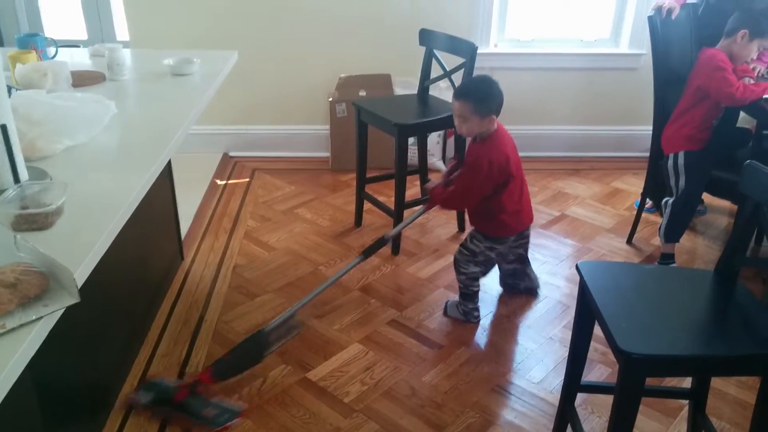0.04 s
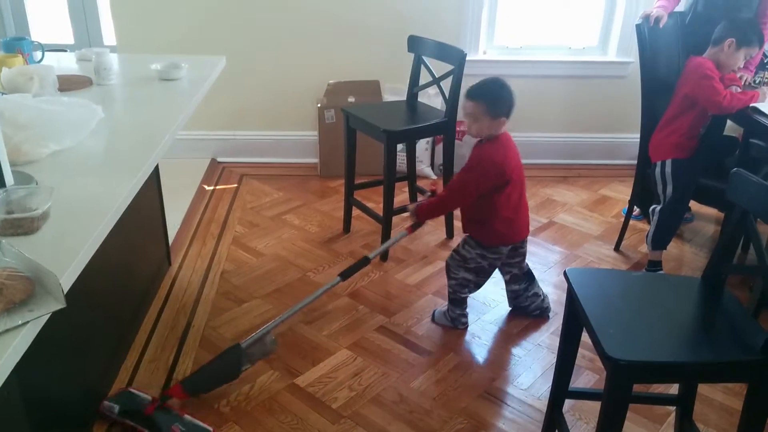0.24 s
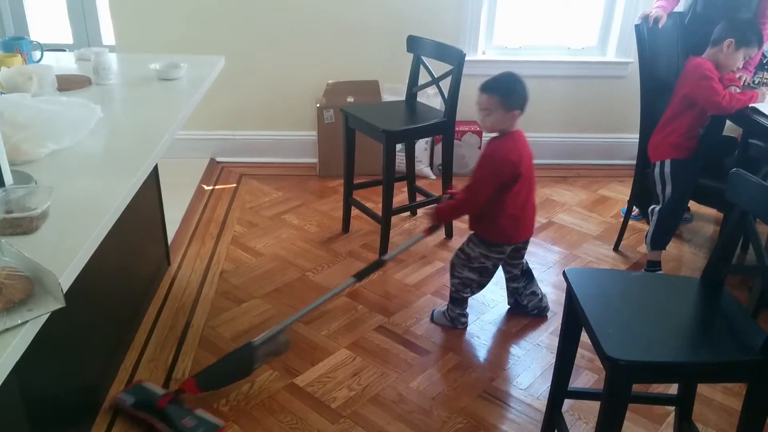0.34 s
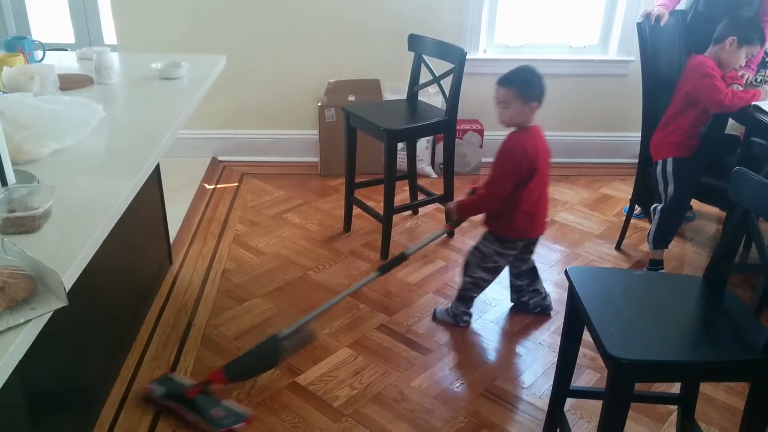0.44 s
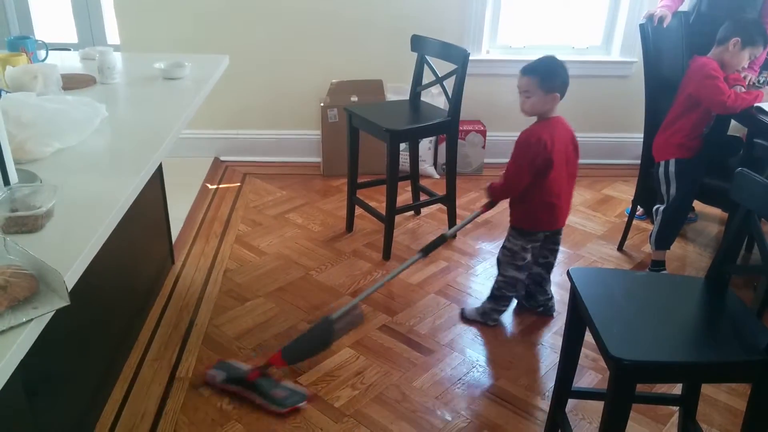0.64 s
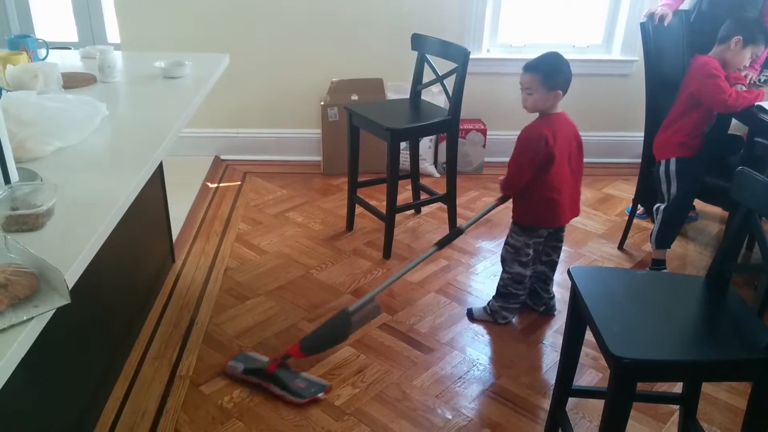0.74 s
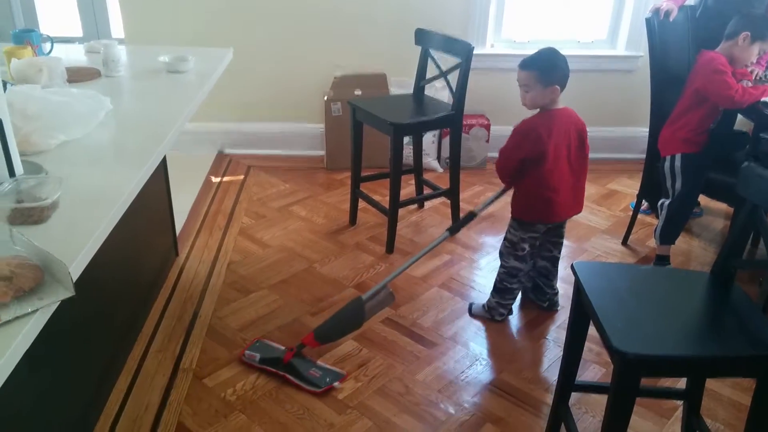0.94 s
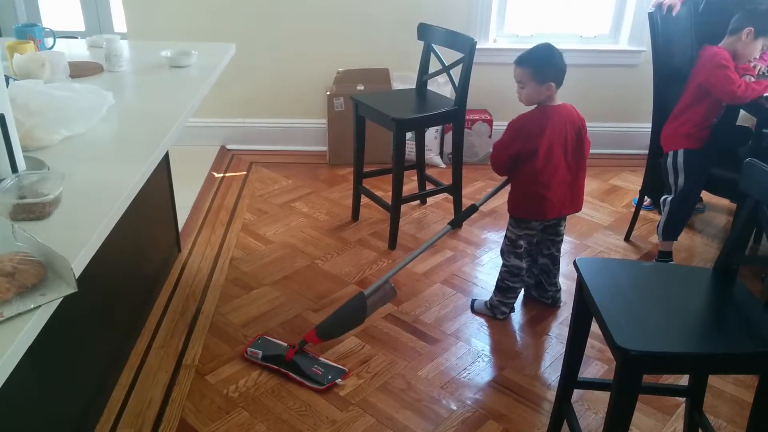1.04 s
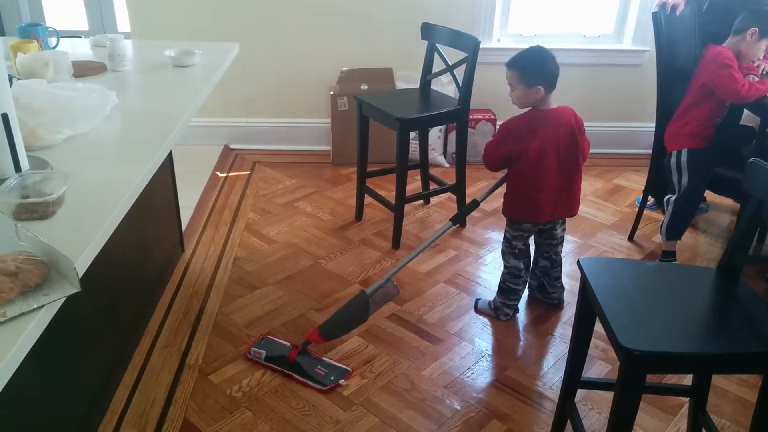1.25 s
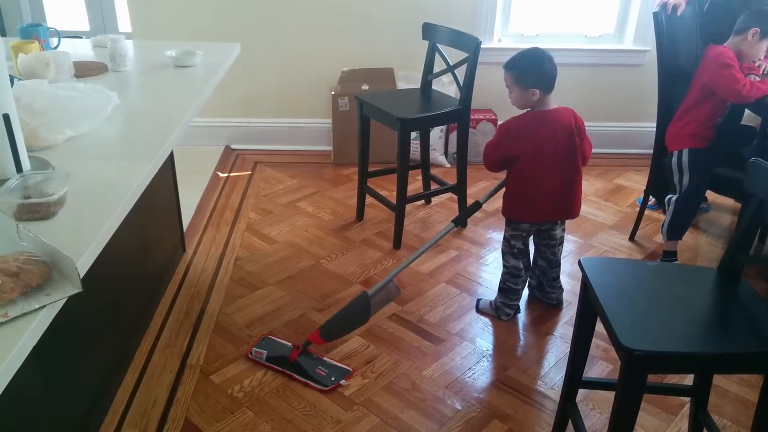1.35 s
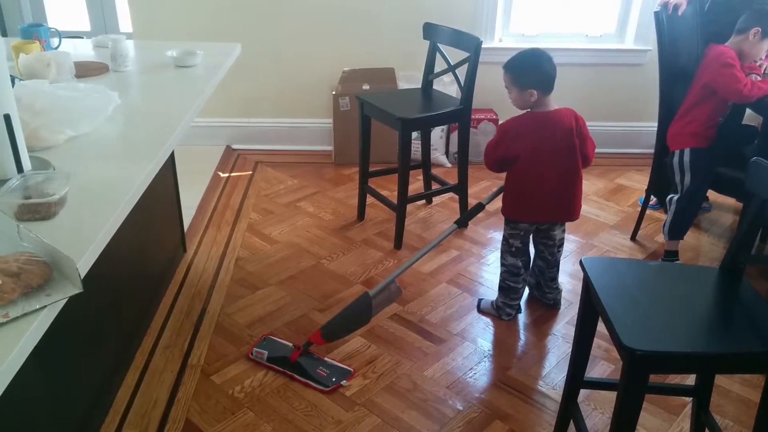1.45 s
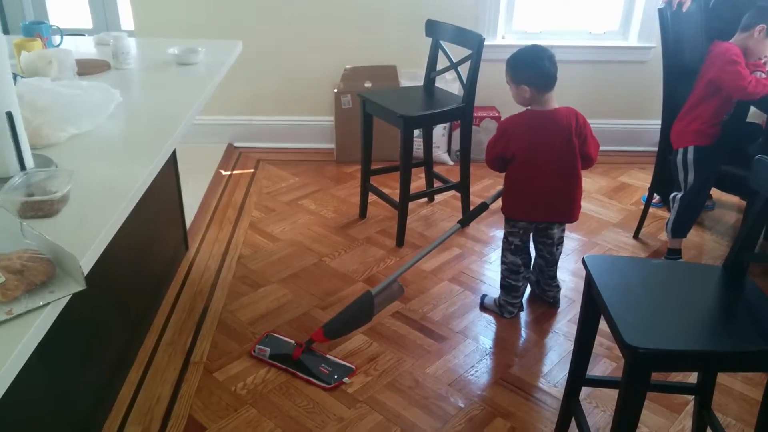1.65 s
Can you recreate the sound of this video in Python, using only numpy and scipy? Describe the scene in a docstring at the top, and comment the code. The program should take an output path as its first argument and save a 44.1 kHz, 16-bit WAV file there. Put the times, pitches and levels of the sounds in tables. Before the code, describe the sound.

A flat mop thumps on wood: after a faint cloth slide over low hum and hiss, it lands at about 0.23 s with a deep boom and plastic rattle lasting to 0.3 s. Bare-room echo dies away. Very soft footfalls come at 0.6-0.76 s, a weak hollow wooden knock flutters around 1.18-1.29 s, and a small plastic tick with quick echo sounds at 1.46 s. Level dips briefly throughout.

```python
"""A bare, echoing kitchen: a flat mop slides over the wooden floor and thumps into a cabinet base.
Soft footfalls, small plastic ticks (the strongest with an echo) and a hollow knock follow, over hum and hiss.
Hits are dying modes plus coloured clicks; slide and hiss are shaped noise; dense echoes make the room.
The direct clatter reaches the microphone dulled, and the whole level dips briefly at set times."""
import sys
import numpy as np
from scipy import signal
from scipy.io import wavfile
from scipy.ndimage import uniform_filter1d

SR = 44100
rng = np.random.default_rng(int(sys.argv[2]) if len(sys.argv) > 2 else 0)


def materialize(psi):
    """Save the field psi as 16-bit PCM at rate SR to the path in sys.argv[1].

    A 1-D psi becomes a single channel; in a 2-D psi each row is a channel.
    """
    bounded = np.clip(np.atleast_2d(psi).T, -1, 1)
    quanta = np.round(bounded * 32767).astype(np.int16)
    wavfile.write(sys.argv[1], SR, quanta)


def gain_from_db(level_db):
    """Turn a decibel level (scalar or array-like) into a linear amplitude factor."""
    decades = np.asarray(level_db, float) / 20
    return 10 ** decades


N = 74970  # length in samples, 1.7 s

# Spectrum tables give relative levels per Hz; their sounds are scaled to a set level afterwards.
# Microphone hiss: (frequency [Hz], level [dB])
HISS_SPECTRUM = [(53, -42), (90, -8), (165, -7.5), (529, -17), (907, -24), (1700, -26), (1930, -45),
                 (3610, -22.5), (15700, -27.5)]
# Slow drift of hum, rumble and hiss together: (time [s], level [dB])
BACKGROUND_DRIFT = [(0, 1), (.22, 7.5), (.6, 0.5), (1.0, 0.5), (1.4, 1), (1.7, -2.5)]
# Further drift of hum and rumble, strongest at first: (time [s], level [dB])
HUM_DRIFT = [(0, 4.5), (.22, -2), (.5, -3.5), (1.0, 2.5), (1.26, 1.5), (1.38, -2), (1.7, 1)]
# Brief dips of the whole level: (centre [s], half length [s], depth [dB])
LEVEL_DIPS = [(0, 0.011, -6), (0.074, 0.0053, -7.5), (0.545, 0.016, -6), (0.603, 0.004, -2),
              (0.689, 0.021, -12.5), (0.851, 0.032, -21), (0.923, 0.0038, -9), (.99, 0.014, -14),
              (1.035, 0.02, -14.5), (1.105, 0.0074, -8), (1.156, 0.018, -6.5), (1.332, 0.03, -3),
              (1.401, 0.023, -8.5), (1.442, 0.0044, -7), (1.502, 0.011, -7.5)]
# Cloth pad sliding: (time [s], level [dB])
SLIDE_LEVEL = [(0, -54.5), (0.101, -50.5), (0.203, -46), (.23, -43.5), (.45, -41), (.63, -56), (0.781, -57),
               (.95, -59.5), (1.1, -60.5), (1.7, -65.5)]
# Colour of the cloth on the boards: (frequency [Hz], level [dB])
CLOTH_SPECTRUM = [(71, -27), (120, 1), (350, -0.5), (546, -8.5), (770, -3), (2640, -7.5), (15000, -27.5)]
# Boards pushed and springing back: (time [s], level [dB])
BOARD_BOOMS = [(0.2277, -10.5), (0.2448, -17.5), (0.2537, -10), (.283, -23.5), (0.2952, -18.5)]
# Polarity of each boom: (sign)
BOOM_SIGNS = [-1, -1, 1, 1, -1]
# Mop head rattling as it lands: (time [s], level [dB])
HEAD_CLATTERS = [(0.2279, 6), (0.2368, -14), (0.2465, -16), (0.256, -5), (.270, -0.5), (0.283, -9),
                 (0.2947, -0.5)]
# Floor and cabinet modes: (frequency [Hz], level [dB], decay by 60 dB [s])
BOARD_MODES = [(59.1, 5, 0.23), (76, 4.5, 0.15), (96.3, 8, 0.16), (114.6, 6, 0.18), (129.7, -4.5, 0.14),
               (147, -0.5, 0.19), (190.2, -5, 0.42), (221.3, -7.5, 0.45), (254.6, -5, 0.31),
               (305, -8, 0.27), (419, -15, 0.19), (503.7, -20.5, 0.67), (623.7, -20, 0.44),
               (702.6, -12.5, 0.16)]
# Clatter of the plastic mop head: (frequency [Hz], level [dB])
CLATTER_SPECTRUM = [(180, -47), (300, -3.5), (550, -8), (820, -9), (1200, -8.5), (1700, -10.5),
                    (2300, -7.5), (3000, -13), (3900, -12.5), (4700, -20), (5400, -17.5), (6300, -21),
                    (7400, -27.5), (9500, -30.5), (10400, -30.5), (15700, -43.5)]
# Soft footfalls on the same boards: (time [s], bass level [dB], scuff level [dB])
FOOTFALLS = [(.622, -48, -28.5), (.718, -47, -48), (.762, -56, -46)]
# Sock on varnish: (frequency [Hz], level [dB])
SCUFF_SPECTRUM = [(700, -15), (1500, -15), (3000, -2.5), (5200, 1.5), (7000, -10), (15700, -19)]
# Small plastic ticks, the strongest with an echo 13 ms later: (time [s], level [dB])
TICK_TIMES = [(1.161, -36), (1.4574, -18), (1.4703, -27.5), (1.518, -36), (1.541, -36)]
# Colour of a tick: (frequency [Hz], level [dB])
TICK_SPECTRUM = [(600, -19), (1100, -5.5), (1450, -8.5), (1800, 0), (2700, 3), (3300, -0.5), (4000, -4.5),
                 (5500, -15), (10200, -21), (15700, -24)]
# Ringing of the plastic: (frequency [Hz], level [dB], decay by 60 dB [s])
TICK_MODES = [(1150, -18, .015), (2330, -4, .016), (2580, 0, .018), (3400, -8, .009)]
# Hollow wooden knocks: (time [s], ring level [dB], click level [dB])
KNOCK_TIMES = [(1.179, -32.5, -13), (1.185, -32, -23), (1.1945, -21, -24.5), (1.2025, -25.5, -31),
               (1.225, -30, -32), (1.240, -38, -25.5), (1.254, -30.5, -27.5), (1.274, -37, -36.5),
               (1.285, -42, -25)]
# Modes of the hollow wood: (frequency [Hz], level [dB], decay by 60 dB [s])
HOLLOW_MODES = [(226, -28, 0.17), (297, -9, 0.07), (372, -4, 0.07), (414, 4, 0.05), (456, -5, 0.08),
                (510, -10, 0.09), (570, -13, 0.08), (606, -14, 0.08)]
# Click of a knock: (frequency [Hz], level [dB])
CLICK_SPECTRUM = [(500, -5), (900, -9), (1500, -15), (2100, -10), (3200, -15.5), (4500, -14), (8000, -21.5),
                  (15700, -34)]
# Room decay before a sound's own tail share: (frequency [Hz], decay by 60 dB [s])
ROOM_DECAY = [(60, 0.86), (160, 0.64), (420, 0.66), (1100, 0.61), (2910, 0.65), (6300, 0.73), (9000, 0.62)]

HISS_DB, HUM_HZ, HUM_DB = -59.5, 60, -50  # levels before the drifts
RUMBLE_HZ, RUMBLE_WIDTH_HZ, RUMBLE_DB = 65, 30, -58
HUM_DIP = 0.43  # share of each dip that hum and rumble take on top of the common one
SLIDE_PATCHY_DB, HISS_PATCHY_DB = 0.8, 0.4
RISE_CYCLES, SCATTER_S = 0.57, 0.001894  # swell of a mode; latest start of a mode
DETUNE, SPOT_DB = 0.035, 4  # full spread of mode frequency (share) and of mode level
TICK_RING_DB, TICK_DRY_DB = -14, -8
ECHO_SPREAD_DB = 5  # some reflections are much stronger than their neighbours
BUILD_S = 0.0047  # build-up time of the reflections
WET_DB, BASS_WET_DB, TAIL = 4.5, -9.5, 0.88  # room on thump and footfalls; share of its decay time
LATE_WET_DB, LATE_BASS_WET_DB, TICK_WET_DB, LATE_TAIL = 2.5, -10, 3, 0.66  # knocks and ticks
DIRECT_DB, DIRECT_HZ = -8.5, 3450  # direct clatter, shaded by the counter
MIC_LOW_HZ, MIC_HIGH_HZ = 50, 15750


def evened(x):
    """Scales to rms 1."""
    return x / np.sqrt(np.mean(x ** 2) + 1e-20)


def over_time(points):
    """Reads a table of times and levels at every sample."""
    return np.interp(np.arange(N) / SR, *np.transpose(points))


def over_frequency(points, hz):
    """Reads a table on a log-frequency axis."""
    f, value = np.transpose(points)
    return np.interp(np.log(hz + 1), np.log(f + 1), value)


def add(mix, s, sound):
    """Mixes a sound in at a time in seconds."""
    part = mix[round(s * SR):][:len(sound)]
    part += sound[:len(part)]


def noise(spectrum, size, patchy_db):
    """Noise of a given colour whose level wanders in patches of time and frequency, rms 1."""
    frames, hz = size // 128 + 6, np.fft.rfftfreq(512, 1 / SR)
    a, b, patches = rng.standard_normal((frames, 257, 3)).T
    patches = uniform_filter1d(patches, size=8, axis=0)  # along frequency
    patches = evened(uniform_filter1d(patches, size=12, axis=1))  # along time
    inside = (hz >= spectrum[0][0])[:, None]
    level = over_frequency(spectrum, hz)[:, None] + patchy_db * patches
    z = (a + 1j * b) * inside * gain_from_db(level)
    return evened(signal.istft(z, nperseg=512, noverlap=384)[1][256:size + 256])


def ring(modes, scatter_s, detune=0.):
    """Dying modes, peak 1; each blow lands on another spot and weighs them a little differently."""
    out = np.zeros(SR // 2)
    for (hz, db, t60), (spot, late, shift) in zip(modes, rng.random((len(modes), 3))):
        hz = hz * (1 + detune * (shift - 0.5))
        t = np.maximum(np.arange(SR // 2) / SR - late * scatter_s, 0)
        decay = gain_from_db(db + SPOT_DB * (spot - 0.5) - 60 * t / t60)
        swell = 1 - np.exp(-t * hz / RISE_CYCLES)
        out += decay * swell * np.sin(2 * np.pi * hz * t)
    return out / abs(out).max()


def crack(spectrum):
    """A minimum-phase click of the given colour, starting at once, energy 1."""
    hz = abs(np.fft.fftfreq(2048, 1 / SR))
    gain = gain_from_db(over_frequency(spectrum, hz)) * (hz >= spectrum[0][0])
    log_gain = np.log(gain + 1e-4)
    phase = -signal.hilbert(log_gain).imag
    out = np.fft.ifft(np.exp(log_gain + 1j * phase)).real[:1024]
    return out / np.linalg.norm(out)


def blows(rows, modes, colour):
    """Hits as a low ringing part and a bright click."""
    low, high = np.zeros((2, N))
    for s, ring_db, click_db in rows:
        add(low, s, -gain_from_db(ring_db) * ring(modes, SCATTER_S, DETUNE))
        add(high, s, gain_from_db(click_db) * crack(colour))
    return np.array([low, high])


def dips_db():
    """The brief dips of the level as one curve in dB."""
    t = np.arange(N) / SR
    return sum(db * np.exp(-abs((t - s) / half) ** 2.7) for s, half, db in LEVEL_DIPS)


def background():
    """Appliance hum at mains pitch, a narrow band of rumble round it, and microphone hiss."""
    t = np.arange(N) / SR
    r = np.exp(-np.pi * RUMBLE_WIDTH_HZ / SR)
    a, b = rng.standard_normal((N, 2)).T
    slow = signal.lfilter([1 - r], [1, -r], a + 1j * b)
    slow = signal.lfilter([1], [1, -r], slow)
    rumble = evened((slow * np.exp(2j * np.pi * RUMBLE_HZ * t)).real)  # slow noise moved up in pitch
    hum = np.sqrt(2) * np.sin(2 * np.pi * (HUM_HZ * t + rng.random()))
    hum_gain = gain_from_db(HUM_DIP * dips_db() + over_time(HUM_DRIFT))
    humming = hum_gain * (gain_from_db(HUM_DB) * hum + gain_from_db(RUMBLE_DB) * rumble)
    hiss = gain_from_db(HISS_DB) * noise(HISS_SPECTRUM, N, HISS_PATCHY_DB)
    return gain_from_db(over_time(BACKGROUND_DRIFT)) * (humming + hiss)


def slide():
    """Cloth rubbing over varnished boards: friction noise that follows a level curve."""
    return gain_from_db(over_time(SLIDE_LEVEL)) * noise(CLOTH_SPECTRUM, N, SLIDE_PATCHY_DB)


def thump():
    """The heavy blow: boards booming in either direction and the rattling mop head."""
    low, high = np.zeros((2, N))
    for (s, db), sign in zip(BOARD_BOOMS, BOOM_SIGNS):
        add(low, s, sign * gain_from_db(db) * ring(BOARD_MODES, SCATTER_S))
    for s, db in HEAD_CLATTERS:
        add(high, s, gain_from_db(db) * crack(CLATTER_SPECTRUM))
    return np.array([low, high])


def room(x, share):
    """Dense reflections that build up quickly, each band dying at its own speed."""
    taps = np.zeros(SR)
    at = np.arange(20, SR - 8, 8)
    places = at + rng.integers(0, 8, len(at))
    signs = rng.choice([-1., 1.], len(at))
    taps[places] = signs * gain_from_db(ECHO_SPREAD_DB * rng.standard_normal(len(at)))
    hz, t, z = signal.stft(taps, SR, nperseg=512)
    t60 = np.clip(share * over_frequency(ROOM_DECAY, hz), 0.1, 2)[:, None]
    tail = signal.istft(z * gain_from_db(-60 * t / t60), SR, nperseg=512)[1][:SR]
    tail = tail * (1 - np.exp(-np.arange(len(tail)) / SR / BUILD_S))
    return signal.fftconvolve(x, tail / np.linalg.norm(tail))[:N]


def footfalls():
    """Soft steps: the boards ring low and a sock scuffs the varnish."""
    return blows(FOOTFALLS, BOARD_MODES, SCUFF_SPECTRUM)


def ticks():
    """Small plastic ticks and the echo of the strongest: a bright snap and a short ringing body."""
    snap, body = np.zeros((2, N))
    for s, db in TICK_TIMES:
        add(snap, s, gain_from_db(db) * crack(TICK_SPECTRUM))
        add(body, s, gain_from_db(db + TICK_RING_DB) * ring(TICK_MODES, 0, DETUNE))
    return snap, body


def knocks():
    """Hollow wooden knocks: short modes of the wood under a click."""
    return blows(KNOCK_TIMES, HOLLOW_MODES, CLICK_SPECTRUM)


def scene():
    """Hits, direct and through the room, over slide and background."""
    low, high = thump() + footfalls()
    snap, body = ticks()
    knock, click = knocks()
    wet = room(gain_from_db(BASS_WET_DB) * low + gain_from_db(WET_DB) * high, TAIL)
    late_send = gain_from_db(LATE_BASS_WET_DB) * knock + gain_from_db(LATE_WET_DB) * click + gain_from_db(TICK_WET_DB) * snap
    late_wet = room(late_send, LATE_TAIL)
    shade = signal.butter(4, DIRECT_HZ, fs=SR, output="sos")
    direct = gain_from_db(DIRECT_DB) * signal.sosfilt(shade, high + click)
    dry_hits = low + knock + body + gain_from_db(TICK_DRY_DB) * snap + direct
    return (dry_hits + wet + late_wet + slide() + background())[None]


def top_cut(x):
    """Nothing passes above the cut-off."""
    return signal.sosfilt(signal.butter(12, 15850, fs=SR, output="sos"), x)


def record(dry):
    """Microphone low cut and upper band limit, then the brief level dips."""
    low_cut = signal.butter(6, MIC_LOW_HZ, "high", fs=SR, output="sos")
    band_limit = signal.firwin(255, MIC_HIGH_HZ, window=("kaiser", 9), fs=SR)
    heard = signal.sosfilt(low_cut, dry)
    heard = signal.oaconvolve(heard, band_limit[None], "same")
    return top_cut(heard * gain_from_db(dips_db()))


dry = scene()
out = record(dry)
materialize(out)
```